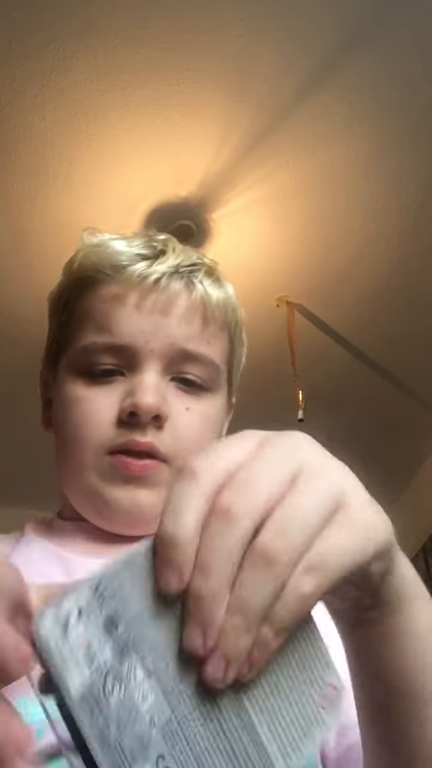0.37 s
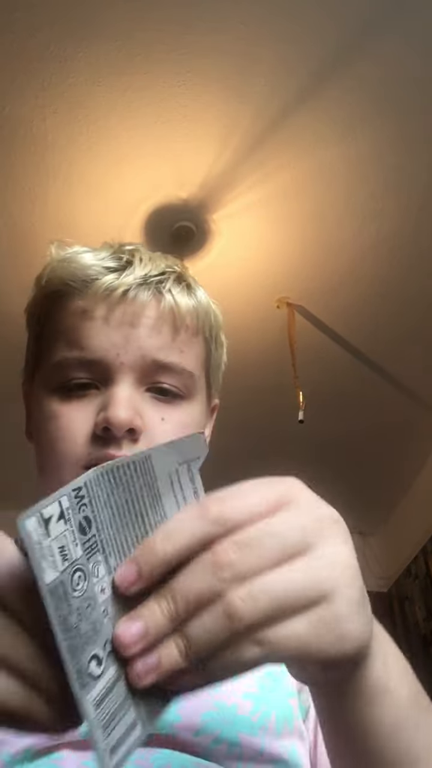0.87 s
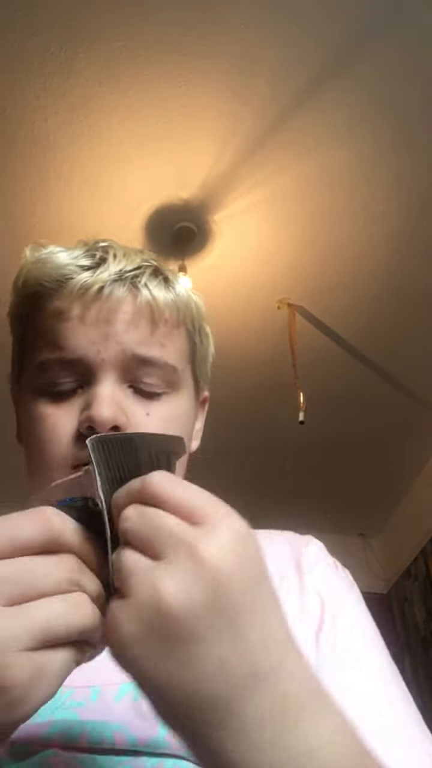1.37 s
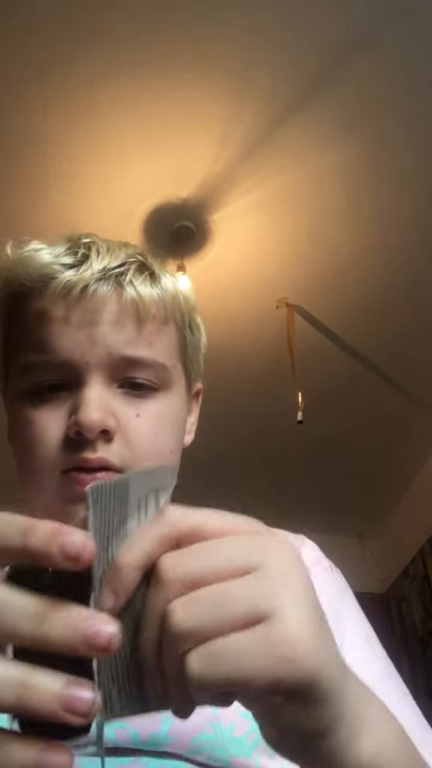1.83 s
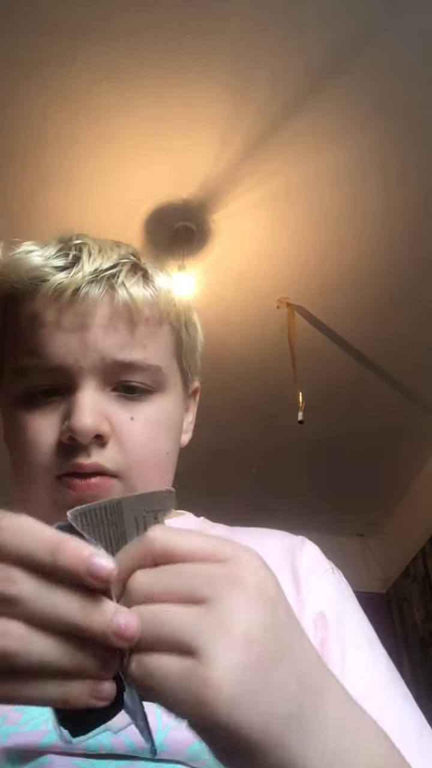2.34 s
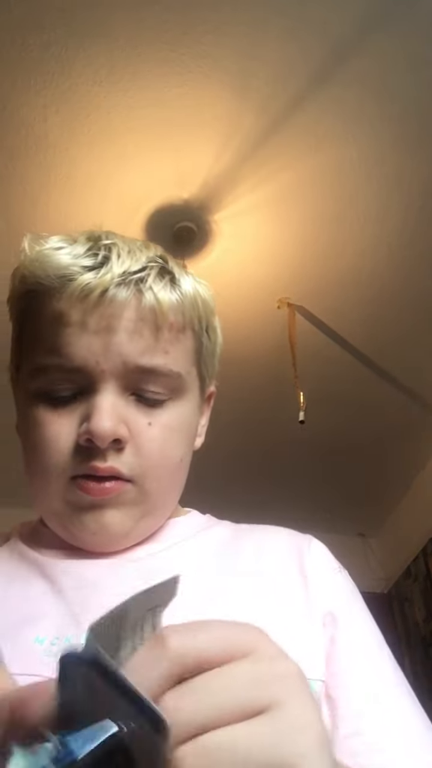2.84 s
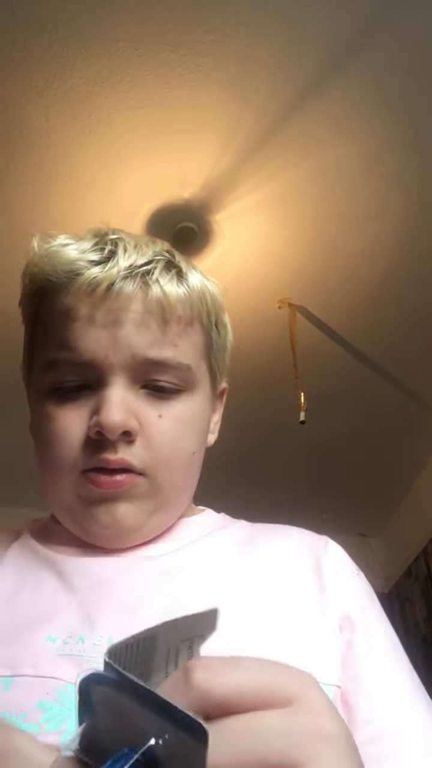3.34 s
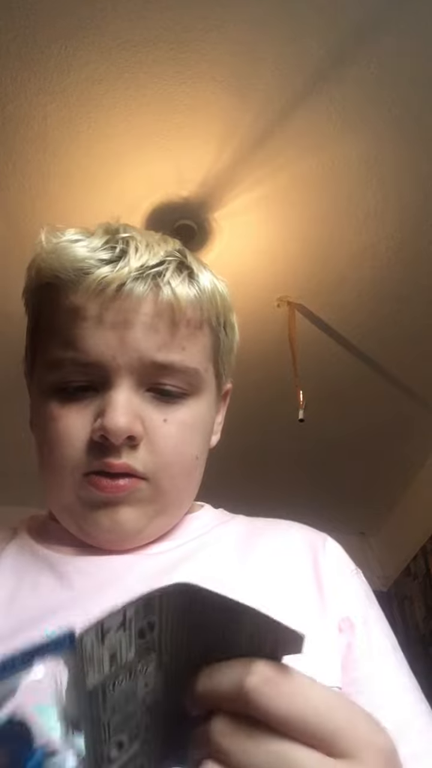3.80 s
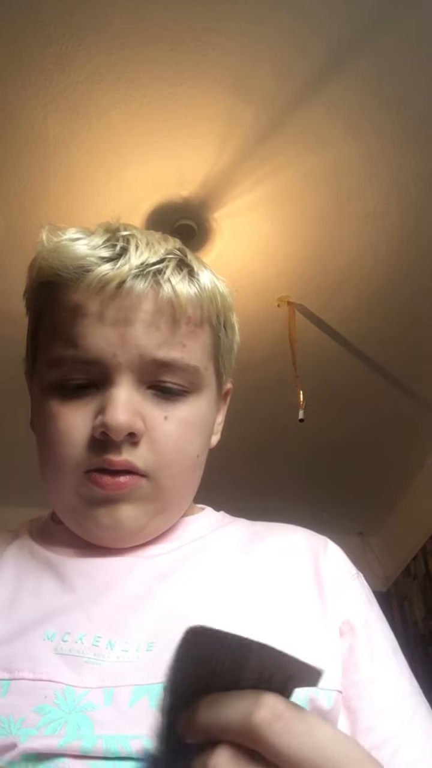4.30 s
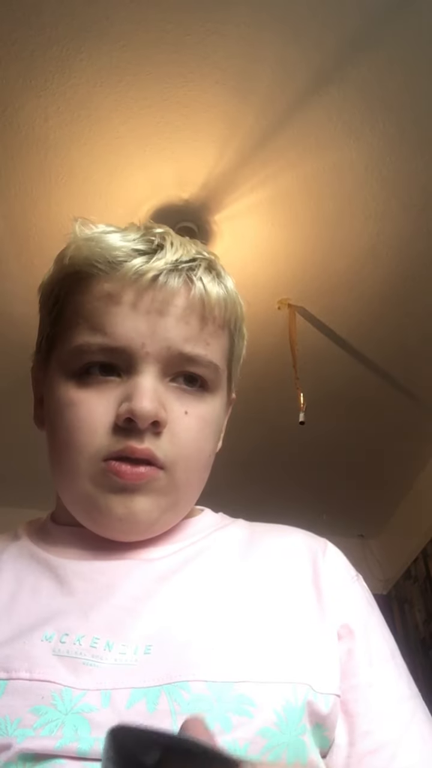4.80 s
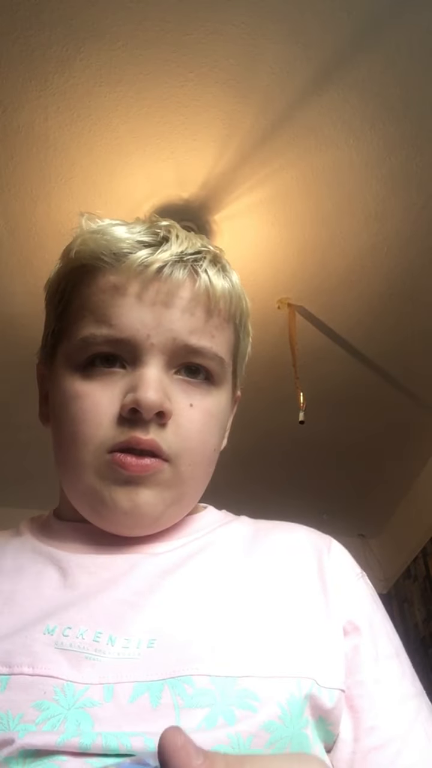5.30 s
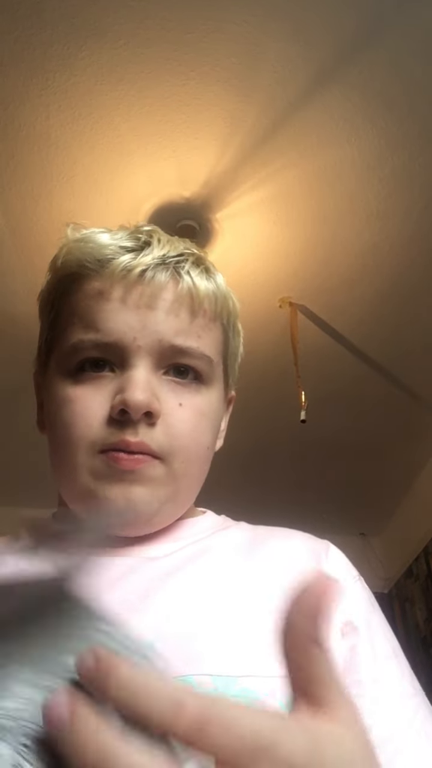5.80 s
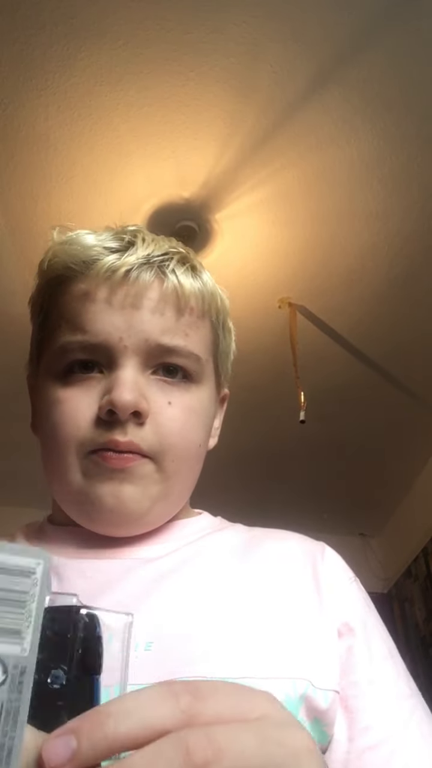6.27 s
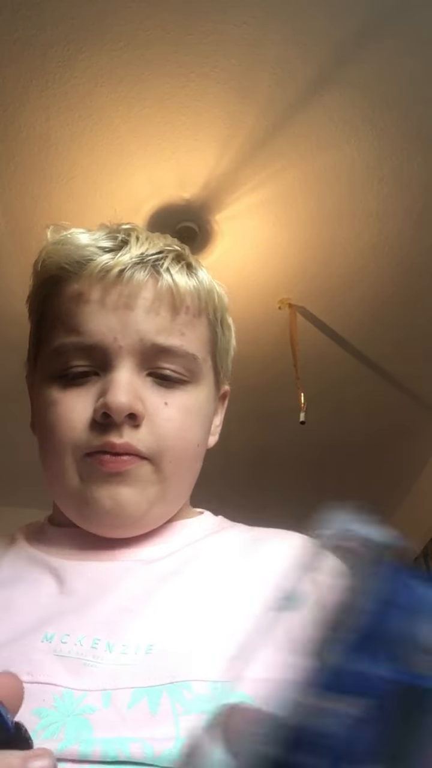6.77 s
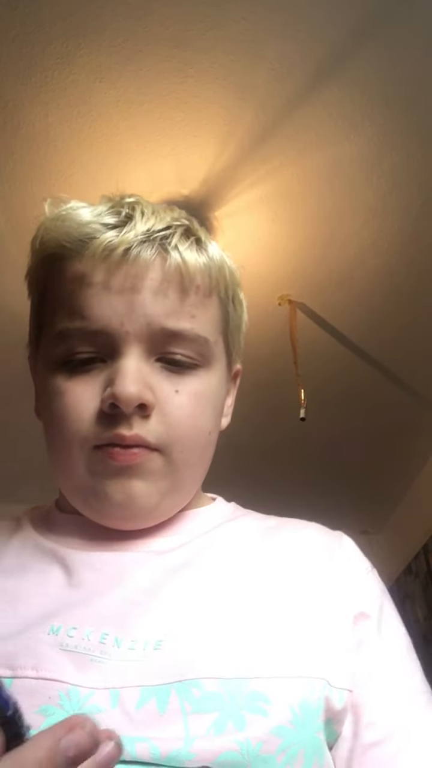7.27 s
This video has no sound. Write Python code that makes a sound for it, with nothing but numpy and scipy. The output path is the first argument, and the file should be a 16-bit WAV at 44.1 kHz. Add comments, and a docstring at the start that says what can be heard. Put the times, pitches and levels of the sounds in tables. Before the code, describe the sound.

A close phone microphone in a small furnished room picks up hands opening a card-and-plastic blister pack over a barely audible hum. From 0 to 0.6 s, light crinkles and creaking card carry a cluster of modest cracks, then a brief lull. Around 1.0-1.3 s crackling resumes, with a sharp bright snap at 1.24. From 1.5 to 2.4 s irregular brittle pops and creaks come thickly; more follow at 2.7-3.3. Cracks grow from 3.5 and burst at 3.75 into the loudest tearing snap, with a dull card thump. Smaller cracks at 4.0-4.2 lead to quiet, then a single very sharp pop at 4.8. Afterwards only sparse, faint crinkling and rubbing remain, with a clear snap at 5.94, a hollow card knock at 6.55, and tiny hard ticks at 6.76 and 7.0 before soft handling fades by 7.4. Echoes are short and faint.

```python
"""Tearing open a blister pack

Hands bend, peel and tear a card-and-plastic blister pack close to a phone in a small furnished room.
The plastic shell buckles with sharp cracks: volleys of random fractures ring the pack's resonances.
The card thuds as damped sines, small hard ticks ring clean modes, and clumped random clicks make
the creaks, crinkles, tearing and rubbing. Decaying noise gives the echoes; coloured noise hums faintly."""
import sys
import numpy as np
from scipy import signal
from scipy.fft import rfft, irfft, next_fast_len
from scipy.io import wavfile

SR = 44100
rng = np.random.default_rng(int(sys.argv[2]) if len(sys.argv) > 2 else 0)


def amplitude_ratio(level_db):
    """Convert a level in decibels to the matching linear amplitude (field) ratio."""
    exponent = np.asarray(level_db, float) / 20
    return 10 ** exponent


def wav_record(signal):
    """Record a signal, one row per channel, as 16-bit PCM in the file named by sys.argv[1]."""
    frames = np.transpose(np.atleast_2d(signal))
    bounded = np.clip(frames, -1, 1)
    # unit amplitude maps onto the largest positive 16-bit level
    quanta = np.round(bounded * 32767).astype(np.int16)
    wavfile.write(sys.argv[1], SR, quanta)


N = 325899

# Timed cracks, loud and faint: t/s, shell ring peak level/dB, buckling patch f/Hz, snap peak level/dB,
# card thud peak level/dB
TIMED_CRACKS = [(.0094, -34.5, 1750, -35, -48), (0.2436, -35, 1730, -57, -58),
                (0.2528, -33.5, 850, -43, -46.5), (.26, -34.5, 2080, -43, -43.5),
                (.379, -28.5, 1550, -38, -42), (0.3921, -31.5, 1910, -48.5, -44),
                (0.421, -20.5, 1860, -45, -37), (.4486, -24.5, 820, -36, -49),
                (0.4812, -25, 2240, -44, -42), (.5384, -37, 2400, -41, -57),
                (.5862, -26.5, 2500, -38.5, -39), (0.605, -34, 1842, -46, -48),
                (0.8082, -48.5, 1099, -49.5, -67), (1.021, -34.5, 2020, -42.5, -64.5),
                (1.048, -33, 2060, -52.5, -57), (1.064, -39, 2050, -49, -45.5),
                (1.102, -39, 3060, -38, -47), (1.1187, -29, 3270, -35, -38.5),
                (1.161, -29, 3050, -33.5, -39), (1.207, -34, 710, -40, -42), (1.231, -28, 2030, -38, -48),
                (1.236, -10, 2780, -17, -26), (1.3254, -28, 3020, -33.5, -44.5),
                (1.3893, -32, 1900, -36.5, -42), (1.43, -40, 2310, -44, -55),
                (1.472, -44.5, 3000, -43, -60), (1.5264, -39, 2840, -45, -53),
                (1.5525, -41.5, 1510, -60, -59), (1.6037, -33, 2830, -38.5, -57),
                (1.614, -26.5, 2680, -57, -58), (1.6387, -18.5, 4618, -25, -51),
                (1.6781, -25, 820, -43.5, -27.5), (1.702, -33.5, 1596, -42, -49),
                (1.7104, -23.5, 2630, -63.5, -48), (1.7627, -36, 1610, -45, -45),
                (1.789, -34, 1450, -42, -58), (1.818, -26, 2526, -43, -46), (1.8363, -19.5, 3600, -24, -55),
                (1.8611, -21, 1700, -37, -47), (1.8868, -31.5, 2040, -27.5, -35.5),
                (1.9157, -31.5, 2880, -66.5, -44), (1.9382, -37, 1380, -38, -59),
                (2.0087, -40, 1420, -41, -49), (2.0562, -39, 2616, -55, -67), (2.0721, -41, 1430, -57, -62),
                (2.0888, -37, 1440, -41.5, -49), (2.118, -21.5, 1376, -35.5, -36),
                (2.1525, -23.5, 2770, -33.5, -36.5), (2.175, -27, 3000, -32.5, -44),
                (2.2262, -22.5, 3080, -27, -37), (2.338, -32, 2997, -30, -53),
                (2.342, -20.5, 2760, -22.5, -33), (2.3493, -20.5, 3126, -31, -37),
                (2.5828, -44, 3070, -39.5, -67), (2.7082, -37.5, 3140, -31.5, -66),
                (2.7738, -30, 710, -52.5, -43), (2.787, -29, 3010, -51.5, -56),
                (2.7978, -22.5, 2060, -39.5, -60), (2.8326, -22.5, 1779, -35, -44),
                (2.9092, -26, 1095, -40, -45.5), (2.9464, -26.5, 4360, -37.5, -37),
                (2.9562, -37, 1530, -35.5, -47), (3.0516, -34, 2680, -47, -45),
                (3.066, -40, 2600, -54, -46), (3.118, -37, 1090, -49, -48), (3.145, -37, 3092, -44, -57),
                (3.156, -33, 1087, -54, -48), (3.194, -33.5, 1110, -40, -44),
                (3.205, -33.5, 1097, -38, -41), (3.239, -38, 1147, -37, -52),
                (3.265, -29.5, 1924, -43.5, -44), (3.2872, -27, 1100, -31, -38),
                (3.3106, -30.5, 3010, -38, -58), (3.3898, -37.5, 1190, -54, -53.5),
                (3.4797, -20.5, 1962, -20.5, -28.5), (3.5523, -32, 2630, -28.5, -41.5),
                (3.611, -18, 3786, -31.5, -44.5), (3.625, -14.5, 1918, -17.5, -32.5),
                (3.6727, -19.5, 3250, -21, -31), (3.7174, -26, 2887, -23.5, -42.5),
                (3.7335, -16.5, 4200, -24.5, -50.5), (3.74, -4.5, 4240, -15.5, -32.5),
                (3.7456, -4, 3000, -6, -17.5), (3.7734, -10.5, 2884, -16.5, -23),
                (3.8773, -24.5, 2905, -42.5, -60), (4.0304, -21, 1882, -36.5, -29),
                (4.0465, -28.5, 2960, -45.5, -46), (4.1494, -29, 1790, -34.5, -36),
                (4.17, -28, 3996, -32.5, -56), (4.273, -50, 1680, -47, -56), (4.3761, -44, 3066, -45, -63),
                (4.564, -38, 1310, -40.5, -50.5), (4.7823, -27.5, 2950, -35.5, -46),
                (4.7897, -24, 3010, -34, -41.5), (4.797, -3, 3140, -3, -30.5),
                (4.974, -36, 2980, -39, -61.5), (4.985, -32.5, 4150, -48, -62),
                (5.0945, -49, 1160, -46, -57.5), (5.2849, -47, 3050, -50.5, -55),
                (5.5954, -29, 3100, -38.5, -50.5), (5.6014, -30.5, 2370, -29.5, -49),
                (5.7019, -29, 2950, -32.5, -73), (5.7616, -41, 2080, -44.5, -64),
                (5.8017, -29.5, 3080, -40.5, -58), (5.8169, -31.5, 2850, -47.5, -45),
                (5.9352, -36.5, 3070, -47, -55.5), (5.9403, -15, 3230, -24.5, -43),
                (6.1908, -36, 4010, -42, -68), (6.237, -35.5, 2800, -44, -53),
                (6.435, -42.5, 3240, -46, -61), (6.545, -18, 1368, -61, -28.5),
                (7.0062, -39.5, 5080, -31.5, -82)]
# Resonances of the pack: f/Hz, bandwidth/Hz, relative level/dB
PACK_RESONANCES = [(386, 550, -18), (620, 750, -14), (1020, 820, 6), (1282, 314, -2), (1911, 300, -7),
                   (2663, 518, 3), (3020, 770, 5), (4076, 490, -3), (4950, 770, -2.5), (6040, 610, -6.5)]


def cracks():
    """Each break is a short volley of fractures: snap first, then the shell's ring, the card's thud last."""
    rise_ms, break_ms, snap_ms = 0.29, 1.3, 0.61
    shiver_db, shiver_ms = -17, 8.2
    patch_db, patch_q = 2.5, 6.1
    spread_db, reach_oct = 3.5, 1.9
    thud_hz, thud_spread_oct = 560, 0.12
    t, ring_db, patch_hz, snap_db, thud_db = np.transpose(np.r_[TIMED_CRACKS, small_cracks()])
    hz, width_hz, mode_db = np.transpose(PACK_RESONANCES)
    size = 2048
    luck = rng.standard_normal((len(t), size + len(hz)))
    ms = np.arange(size) * 1000 / SR
    fractures = luck[:, :size] * np.abs(luck[:, :size]) * (1 - np.exp(-ms / rise_ms))
    fractures[:, 4] = 0.56   # every break opens with one firm fracture

    # after the break the torn edge goes on shivering for a moment
    shiver = amplitude_ratio(shiver_db) * np.exp(-ms / shiver_ms)
    break_fall, snap_fall = np.exp(-ms / break_ms), np.exp(-ms / snap_ms)
    volley = fractures * (break_fall + shiver)

    # the patch that buckles has a pitch of its own and drives the resonances near it hardest
    octaves = np.log2(hz / patch_hz[:, None])
    nearness = 1 / (1 + (octaves / reach_oct) ** 2)
    # a dull break, with little snap, also leaves the resonances above its patch quiet
    dullness = np.minimum(snap_db - ring_db + 20, 0)[:, None]
    dulling_db = dullness * np.maximum(octaves, 0)
    mode_gain = amplitude_ratio(mode_db + dulling_db + spread_db * luck[:, size:])
    polarity = (-1) ** np.arange(len(hz))
    strengths = (hz > 800) * nearness * mode_gain * polarity
    body = strengths @ ringing(hz, width_hz, size)
    body = body + amplitude_ratio(patch_db) * ringing(patch_hz, patch_hz / patch_q, size)

    ring = band(signal.fftconvolve(volley, body, axes=1)[:, :size], 1100, 7000)
    snap = band(fractures * (snap_fall + shiver), 3000, 9000)
    # the highest treble is weaker and brief
    snap = snap + amplitude_ratio(-6) * band(fractures * snap_fall, 6000, 14500)
    thud = thuds(fractures * break_fall, thud_hz * 2 ** (thud_spread_oct * luck[:, 0]))
    layers = [(thud_db, thud), (ring_db, ring), (snap_db, snap)]
    return place(t, sum(amplitude_ratio(peak_db)[:, None] * peak_one(layer) for peak_db, layer in layers))


def small_cracks():
    """Chance rows like those of the timed cracks, likelier where the hands work harder."""
    count = 180
    t, (crinkle, *_) = effort()
    share = np.cumsum(np.sqrt(crinkle))
    luck, bell = rng.random((count, 2)), rng.standard_normal((count, 3))
    start = np.interp(luck[:, 0], share / share[-1], t)
    crinkle_db = 20 * np.log10(np.interp(start, t, crinkle))
    ring_db = np.minimum(crinkle_db + 11.5, -34) + 6 * bell[:, 0]
    patch_hz = 800 * 4.0 ** luck[:, 1]
    snap_db = ring_db - 8.5 + 5 * bell[:, 1]
    thud_db = ring_db - 20.5 + 5 * bell[:, 2]
    return np.c_[start, ring_db, patch_hz, snap_db, thud_db]


def thuds(blows, hz, thud_q=2.2, low_hz=160):
    """A soft, wide push: the card's flexing shapes both the blow and its ring."""
    size = blows.shape[1]
    flex = ringing(hz, hz / thud_q, size)
    push = signal.fftconvolve(blows, flex, axes=1)[:, :size]
    ring = signal.fftconvolve(push, flex, axes=1)[:, :size]
    return peak_one(band(ring, low_hz, 1500))


# Dull card thuds, alone or under a crack: t/s, peak level/dB, thud f/Hz
CARD_THUDS = [(0.032, -40.5, 530), (.2003, -44.5, 557), (0.2543, -51, 146), (.379, -41, 240),
              (.4796, -48.5, 175), (0.686, -37.5, 455), (1.238, -40, 173), (1.583, -35.5, 700),
              (2.8322, -40.5, 288), (3.6238, -26.5, 395), (3.7464, -15, 382), (4.156, -31, 620),
              (4.798, -23, 636), (5.739, -58, 330), (5.942, -36, 475), (6.068, -60, 101),
              (6.449, -58, 98.5), (6.545, -26, 483), (6.546, -48.5, 108.4), (6.964, -44.5, 169.6),
              (6.981, -50.5, 111.6), (7.08, -62, 100)]


def card_thuds():
    """A dull card thud, alone or under a crack: a brief noisy blow rings its damped flexing."""
    blow_ms = 0.43
    t, peak_db, hz = np.transpose(CARD_THUDS)
    ms = np.arange(4096) * 1000 / SR
    blows = (1 + rng.standard_normal((len(t), len(ms)))) * np.exp(-ms / blow_ms)
    return place(t, amplitude_ratio(peak_db)[:, None] * thuds(blows, hz, thud_q=2.9, low_hz=71.4))


# Something small and hard ticks in the shell: t/s, peak level/dB
SHELL_TICKS = [(6.7647, -40.5), (7.0057, -39), (7.069, -47)]
# Modes struck by a tick: f/Hz, relative level/dB, T60 decay/s
TICK_RESONANCES = [(2432, -2, 0.037), (3330, -19, .012), (4800, 2.5, 0.02), (6400, -9.5, 0.011)]


def ticks():
    """Each tick strikes a few short clean modes, with chance strengths."""
    t, peak_db = np.transpose(SHELL_TICKS)
    hz, mode_db, t60 = np.transpose(TICK_RESONANCES)
    strengths = amplitude_ratio(mode_db + 2.5 * rng.standard_normal((len(t), len(hz))))
    width_hz = np.log(1000) / np.pi / t60
    sounds = peak_one(strengths @ ringing(hz, width_hz, size=4096))
    return place(t, amplitude_ratio(peak_db)[:, None] * sounds)


# Colour of tearing and rubbing: f/Hz, relative level/dB per Hz
RUB_COLOUR = [(3000, -9.5), (4500, 0.5), (5500, 4.5), (7000, -0.5), (10000, -4.5), (13000, -1.5),
              (15500, -25.5)]


def handling():
    """Small creaks and crinkles ring in the pack; fibres part and skin rubs with a fine dense grain."""
    t, levels = effort()
    crinkle_gain, creak_gain, rub_gain = [np.interp(np.arange(N) / SR, t, level) for level in levels]
    clicks = rms_one(grains(per_s=1500, spread_db=3.5, clump_db=4.0, clump_rate=45))
    # sparse small snaps stand out of the grain and reach up into the treble as well
    snaps = rms_one(grains(per_s=200, spread_db=4.0, clump_db=3.0, clump_rate=20))
    clicks = clicks + 0.71 * snaps
    low_creak = rms_one(band(clicks, 93, 350))
    creak = rms_one(through_pack(clicks, 1, 800, spread_db=2.0) + 0.25 * low_creak)
    crinkle = through_pack(clicks, 800, SR, spread_db=2.5)
    fibres = rms_one(grains(per_s=6000, spread_db=3.5, clump_db=1.8, clump_rate=25))
    rub = coloured(fibres + 0.27 * snaps, RUB_COLOUR)
    return creak_gain * creak + crinkle_gain * crinkle + rub_gain * rub


def through_pack(clicks, low_hz, high_hz, spread_db):
    """Clicks excite the pack's resonances within a range, with strengths that wander slowly at random."""
    out = 0
    for k, (hz, width_hz, level_db) in enumerate(PACK_RESONANCES):
        if low_hz <= hz < high_hz:
            r, w = np.exp(-np.pi * width_hz / SR), 2 * np.pi * hz / SR
            wandering = clicks * amplitude_ratio(level_db + spread_db * drift(8.3))
            ring = signal.lfilter([0, np.sin(w)], [1, -2 * r * np.cos(w), r * r], wandering)
            out = out + (-1) ** k * ring
    return rms_one(out)


# Grips and pulls: t/s, length/s, shell crinkle level/dB, bent-card creak level/dB, tearing and rubbing level/dB
HAND_GRIPS = [(0, .05, -53, -61, -60.5), (0.142, .06, -57.5, -66.5, -62), (0.243, .06, -55.5, -53.5, -64.5),
              (.37, 0.14, -47, -44, -63), (0.566, .05, -50.5, -47, -70), (.67, 0.054, -55, -58.5, -63),
              (0.796, 0.033, -67, -65, -95.5), (0.882, 0.055, -63.5, -61, -71.5),
              (1.033, .2, -53, -52, -63.5), (1.369, 0.12, -54, -56.5, -81), (1.551, 0.11, -58, -56.5, -69),
              (1.726, 0.06, -54.5, -51.5, -73), (1.822, .14, -48.5, -50.5, -67),
              (2.015, 0.076, -57, -61.5, -77), (2.101, 0.22, -57.5, -63.5, -66),
              (2.327, .07, -52, -58.5, -54.5), (2.614, .14, -61, -71, -58.5), (2.774, .1, -48, -48.5, -71),
              (2.942, .04, -48, -57, -76), (3.025, .06, -60.5, -57.5, -75), (3.116, .21, -50.5, -51, -68),
              (3.403, .15, -50.5, -53.5, -58.5), (3.615, .08, -38, -46, -41.5),
              (3.734, .04, -33.5, -36.5, -42.5), (4.035, .05, -58.5, -49.5, -64.5),
              (4.137, .05, -45, -48, -64.5), (4.281, .2, -64.5, -65.5, -71), (4.55, .15, -56.5, -64, -64.5),
              (4.957, .04, -59.5, -81, -74), (5.12, 0.46, -70.5, -74, -76), (5.603, .025, -50, -71, -65),
              (5.691, .14, -56.5, -59.5, -66.5), (5.959, .05, -58.5, -62.5, -69),
              (6.06, 0.047, -64.5, -64.5, -65.5), (6.145, .15, -58, -64.5, -69),
              (6.473, .06, -54, -57, -71), (6.959, 0.031, -70, -66.5, -81), (7.058, .12, -67, -79, -71),
              (7.26, 0.19, -73.5, -77, -75)]


def effort():
    """Levels of crinkle, creak and tearing each millisecond: grips rise, hold and fall; cracks settle."""
    rise_db_per_s, fall_db_per_s, settle_fall_db_per_s = 900, 282, 260
    t = np.arange(N * 1000 // SR + 2) / 1000
    start, length, *grip_db = np.transpose(HAND_GRIPS)[:, :, None]
    before, after = np.maximum(start - t, 0), np.maximum(t - start - length, 0)
    away_db = rise_db_per_s * before + fall_db_per_s * after
    crack_t, ring_db, _, snap_db, thud_db = np.transpose(TIMED_CRACKS)[:, :, None]
    settle = (t > crack_t) * amplitude_ratio(-settle_fall_db_per_s * np.maximum(t - crack_t, 0))
    # crinkle settles from the ring (less if the snap is weak), creak from the thud, tearing from the snap
    settle_db = [np.minimum(ring_db, snap_db + 20) - 32, thud_db - 20, snap_db - 32.5]
    power = [np.sum(amplitude_ratio(held_db - away_db) ** 2, axis=0) + np.sum((amplitude_ratio(left_db) * settle) ** 2, axis=0)
             for held_db, left_db in zip(grip_db, settle_db)]
    return t, np.sqrt(power)


def grains(per_s, spread_db, clump_db, clump_rate):
    """Random clicks of very unequal size that come in clumps of loudness."""
    born = rng.random(N) < per_s / SR
    sizes = amplitude_ratio(spread_db * np.minimum(rng.exponential(1, N), 4) + clump_db * drift(clump_rate))
    return born * sizes * rng.choice([-1, 1], N) + 1e-18


# Reverberation time of the room: f/Hz, T60 decay/s
ROOM_DECAY = [(100, .15), (500, .35), (2000, .36), (5000, .32), (11000, .19)]


def room(x):
    """Diffuse echoes: octave bands of noise that die at the rate of their band."""
    first_wall_ms = 3.7
    t = np.arange(SR // 2) / SR
    tail, edges = 0, 60 * 2.0 ** np.arange(9)
    for low, high in zip(edges, edges[1:]):
        fall = amplitude_ratio(-60 * t / at_hz(ROOM_DECAY, np.sqrt(low * high)))
        tail = tail + fall * band(rng.standard_normal(len(t)), low, high)
    # silent until the first wall answers, then fading in over as long again
    tail = tail * np.clip(t * 1000 / first_wall_ms - 1, 0, 1)
    return signal.fftconvolve(x, tail / np.sqrt(np.sum(tail ** 2)))[:N]


# Colour of the room's hum: f/Hz, relative level/dB per Hz
HUM_COLOUR = [(18, -27), (30, 2.5), (90, 7.5), (584, -2.5), (962, -22.5), (1160, -8), (2120, -12),
              (3060, -9), (3580, -9), (12600, -19), (16000, -43.5)]


def hum():
    """The room's faint hum: coloured noise whose level wanders slowly."""
    level_db = -69.5 + 1.5 * drift(3.2)
    return amplitude_ratio(level_db) * coloured(rng.standard_normal(N), HUM_COLOUR)


def rms_one(x):
    """Scales to rms 1."""
    return x / np.sqrt(np.mean(x ** 2) + 1e-20)


def peak_one(rows):
    """Scales every row to peak 1."""
    return rows / (np.abs(rows).max(axis=1, keepdims=True) + 1e-12)


def at_hz(points, hz):
    """Reads a table on a log-frequency axis."""
    table_hz, values = np.transpose(points)
    return np.interp(np.log(hz), np.log(table_hz), values)


def coloured(x, spectrum):
    """Gives a white signal the spectrum of a table, rolled off below its first frequency; rms 1."""
    size = next_fast_len(N)
    hz = np.maximum(np.arange(size // 2 + 1) * SR / size, 1)
    edge = 1 / (1 + (spectrum[0][0] / hz) ** 4)
    return rms_one(irfft(rfft(x, size) * amplitude_ratio(at_hz(spectrum, hz)) * edge, size)[:N])


def band(x, low_hz, high_hz):
    """Butterworth band-pass along time."""
    return signal.sosfilt(signal.butter(2, [low_hz, high_hz], "band", fs=SR, output="sos"), x)


def drift(rate_hz):
    """Slow random wander of rms 1: noise through two equal low-pass poles."""
    r = np.exp(-2 * np.pi * rate_hz / SR)
    return rms_one(signal.lfilter([1], [1, -2 * r, r * r], rng.standard_normal(N + SR))[SR:])


def ringing(hz, width_hz, size):
    """Dying sines, one a row; a wider resonance dies sooner."""
    t = np.arange(size) / SR
    return np.exp(-np.pi * np.outer(width_hz, t)) * np.sin(2 * np.pi * np.outer(hz, t))


def place(starts, sounds):
    """Adds each sound at its time in seconds."""
    out = np.zeros(N + sounds.shape[1])
    for at, sound in zip((starts * SR).astype(int), sounds):
        out[at:at + len(sound)] += sound
    return out[:N]


def scene():
    """The pack with its echoes over the hum."""
    pack = cracks() + card_thuds() + ticks() + handling()
    echoes = amplitude_ratio(-20) * room(pack)
    return (pack + echoes + hum())[None]


def band_limit(x):
    """A steep low-pass at the top of the band."""
    return signal.sosfilt(signal.butter(12, 16510, fs=SR, output="sos"), x)


def record(dry):
    """The phone cuts the top and the deep bass."""
    top_cut = signal.cheby2(8, 40, 16400, fs=SR, output="sos")
    bass_cut = signal.butter(4, 56, "high", fs=SR, output="sos")
    mix = signal.sosfilt(bass_cut, signal.sosfilt(top_cut, dry))
    return band_limit(mix)


dry = scene()
out = record(dry)
wav_record(out)
```